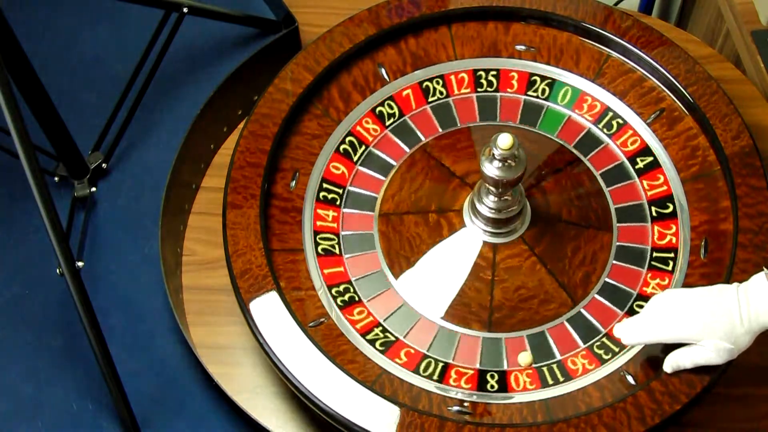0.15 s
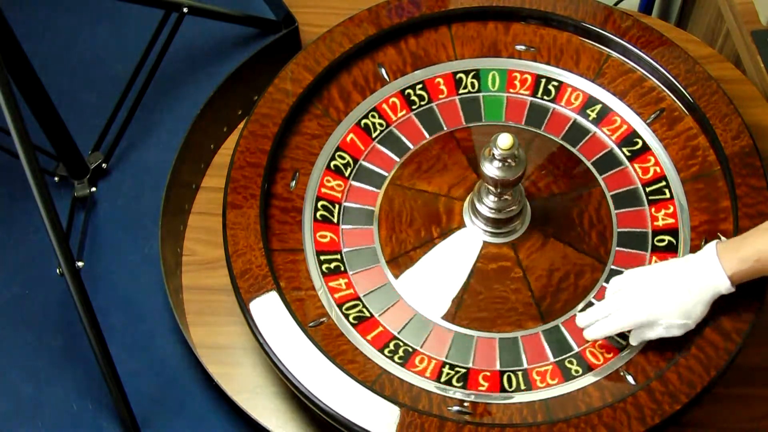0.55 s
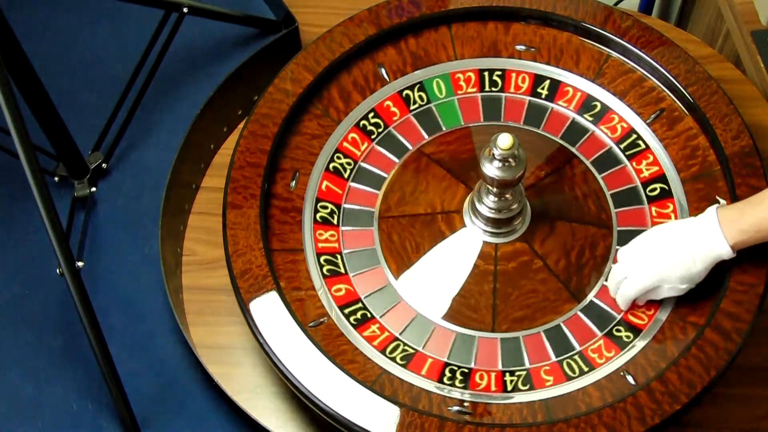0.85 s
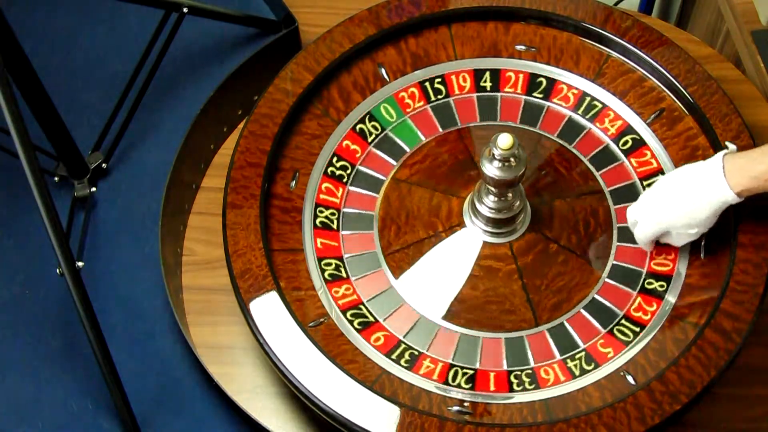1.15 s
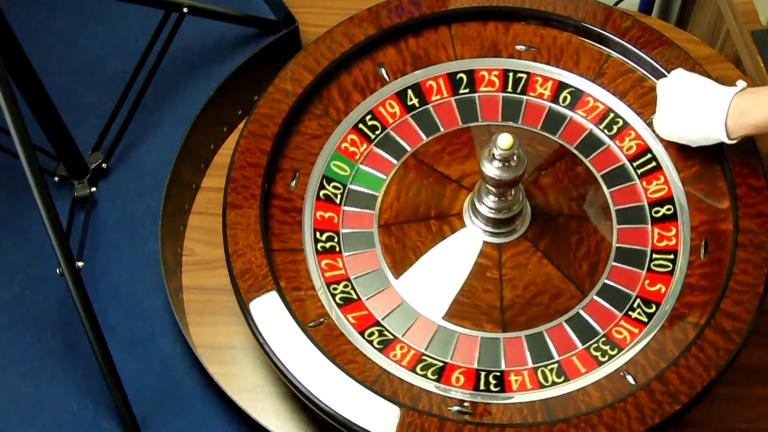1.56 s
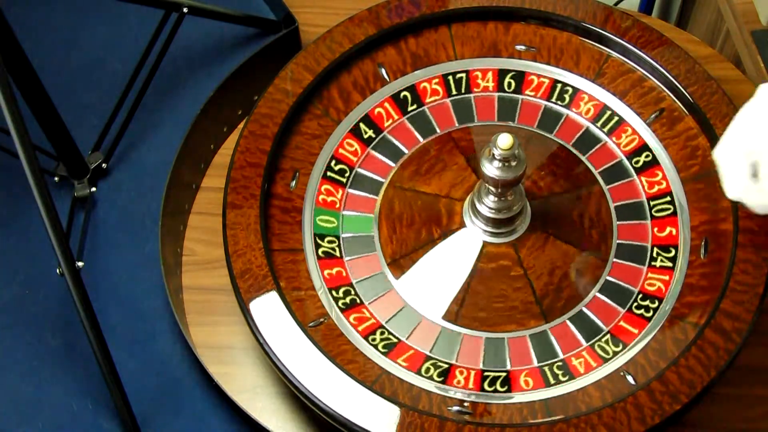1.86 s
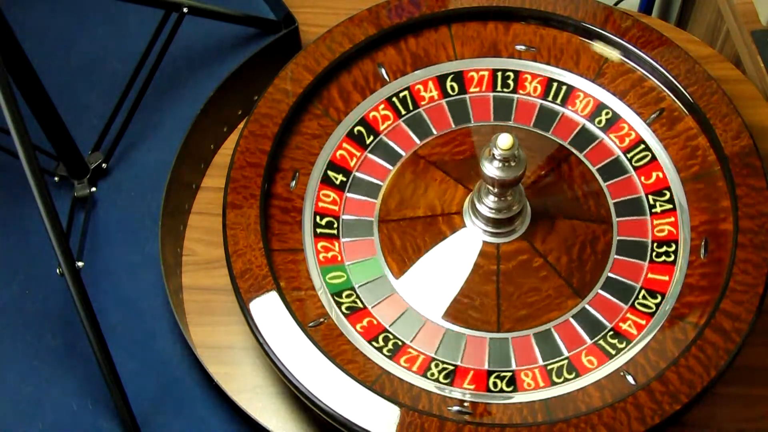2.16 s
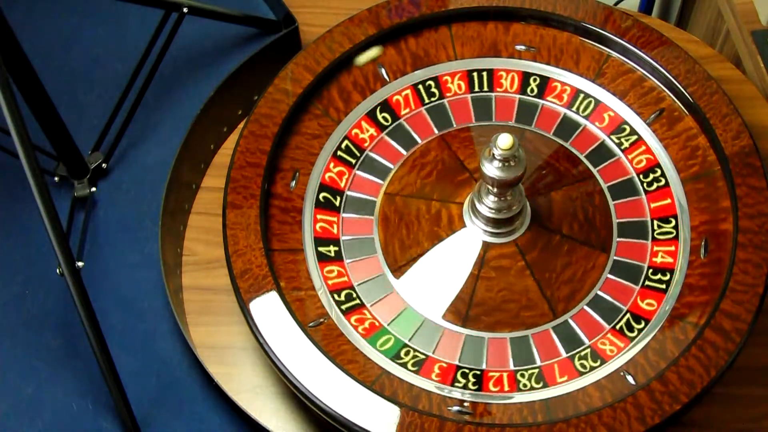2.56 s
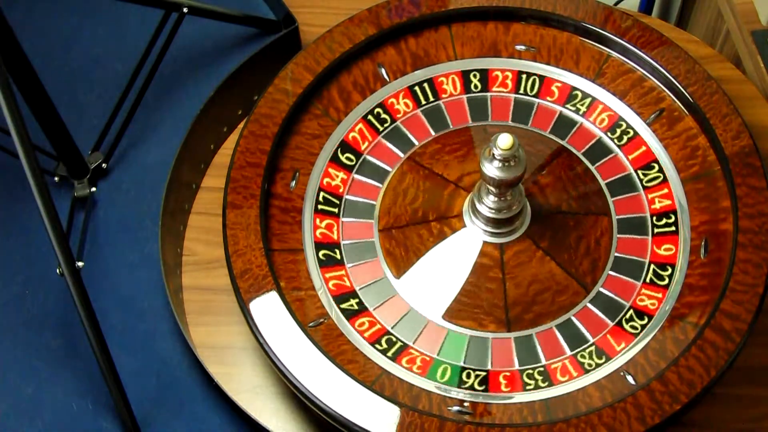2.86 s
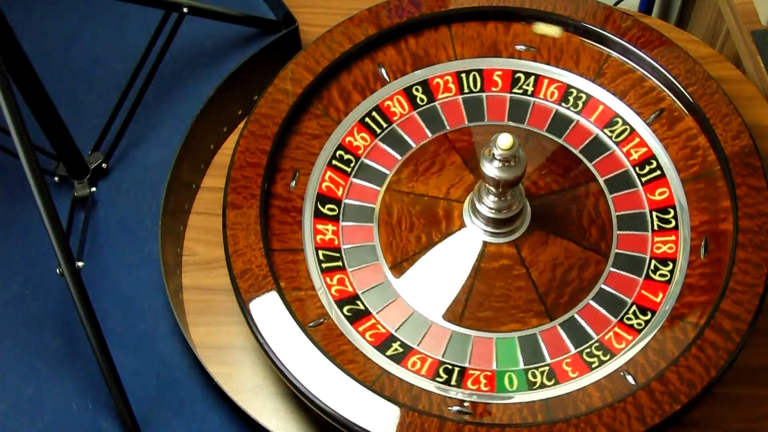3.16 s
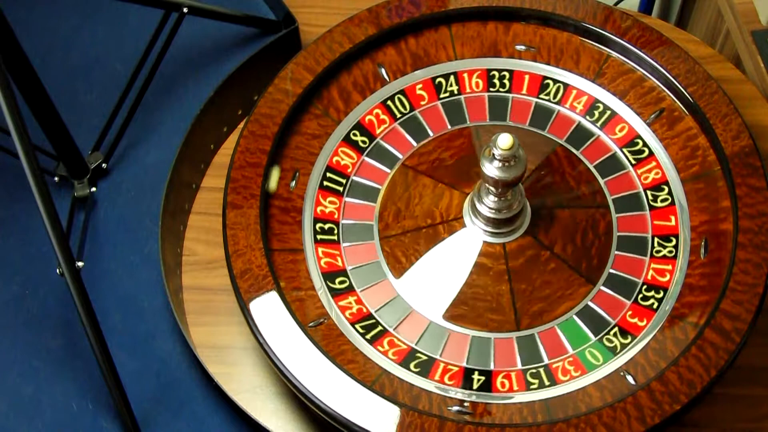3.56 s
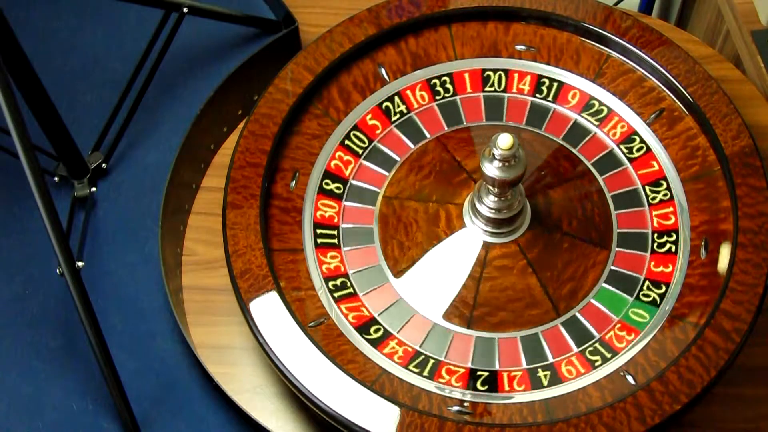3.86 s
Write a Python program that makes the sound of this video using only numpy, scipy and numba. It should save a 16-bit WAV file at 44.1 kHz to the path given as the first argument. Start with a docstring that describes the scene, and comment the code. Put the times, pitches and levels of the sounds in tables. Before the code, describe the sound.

A roulette ball rolls fast around a wooden bowl with a continuous grainy rumble, preceded by a few light metal clinks and a wooden clack; close stereo microphone in a small quiet room with faint hiss.

```python
"""Metal clinks, a wooden clack and a grainy rolling rumble over room rumble, hiss and a faint high whine.
A hand picks the ball from its pocket in a turning roulette wheel: the frets ring as decaying sine modes.
It presses the ball on the wooden track and flicks it away: band-limited knocks, one low hand thump and
a judder of bumps. The ball circles the bowl: random bumps drive rumble, grit, thrum and a gliding chatter.
"""
import sys
import numpy as np
from scipy import signal
from scipy.fft import rfft, irfft
from scipy.io import wavfile
from scipy.ndimage import uniform_filter1d
from numba import njit

SR = 44100
rng = np.random.default_rng(int(sys.argv[2]) if len(sys.argv) > 2 else 0)


def materialize(psi):
    """Save the field psi as 16-bit PCM at rate SR to the path in sys.argv[1].

    A 1-D psi becomes a single channel; in a 2-D psi each row is a channel.
    """
    bounded = np.clip(np.atleast_2d(psi).T, -1, 1)
    quanta = np.round(bounded * 32767).astype(np.int16)
    wavfile.write(sys.argv[1], SR, quanta)


N = 176400
TIME = np.arange(N) / SR
LAUNCH_S = 1.793

# ball touches the frets: t/s, ring level/dB, favoured f/Hz, scuff level/dB
FRET_TOUCHES = [(.058, -46, 650, -23), (.646, -55, 1300, -36), (.666, -36.5, 1730, -10),
                (.872, -46.5, 1510, -47), (0.907, -34.5, 1590, -11)]
# strength of rolling: t/s, chatter level/dB, treble level/dB
ROLL_LEVELS = [(1.8, -41, -30.5), (1.85, -28, -33), (1.87, -32, -32.5), (1.895, -35, -30),
               (1.925, -36.5, -24), (1.945, -25, -30), (1.965, -40, -29.5), (1.985, -45, -18),
               (2.045, -29.5, -22.5), (2.095, -31, -31.5), (2.125, -32.5, -26.5), (2.15, -32, -33.5),
               (2.175, -41, -22.5), (2.205, -39, -29.5), (2.22, -36, -24.5), (2.31, -34.5, -33.5),
               (2.35, -33.5, -34), (2.39, -38, -38), (2.42, -40, -33), (2.445, -34.5, -35),
               (2.5, -38.5, -32), (2.53, -31, -31), (2.56, -36.5, -28.5), (2.595, -43, -36.5),
               (2.63, -32.5, -32.5), (2.69, -31.5, -34), (2.735, -34, -32.5), (2.77, -43, -32.5),
               (2.825, -29, -29.5), (2.86, -30, -31), (2.885, -35.5, -30), (2.93, -39.5, -26),
               (3.0, -34.5, -26.5), (3.09, -42.5, -30.5), (3.135, -35.5, -33), (3.17, -38, -30),
               (3.22, -35.5, -28), (3.35, -33.5, -33), (3.38, -37.5, -35), (3.42, -42, -25.5),
               (3.45, -36.5, -42.5), (3.48, -39.5, -32.5), (3.52, -37, -35), (3.6, -39, -38),
               (3.67, -42, -33.5), (3.71, -35, -33), (3.755, -31.5, -33.5), (3.79, -39.5, -32.5),
               (3.825, -36, -30), (3.87, -42, -34), (3.9, -38, -35.5), (3.925, -43, -32.5),
               (3.945, -33.5, -29), (3.975, -40.5, -38.5), (4.0, -54, -29)]
# pitch of the ball's chatter on the track: t/s, f/Hz
CHATTER_PITCH = [(1.795, 2270), (1.83, 1190), (1.87, 840), (1.94, 626), (1.99, 574), (2.045, 640),
                 (2.09, 620), (2.125, 645), (2.17, 730), (2.22, 517), (2.26, 590), (2.3, 527), (2.335, 853),
                 (2.39, 935), (2.445, 936), (2.49, 720), (2.545, 605), (2.585, 490), (2.62, 670),
                 (2.72, 710), (2.745, 577), (2.765, 830), (2.8, 550), (2.845, 562), (2.865, 820),
                 (2.9, 516), (2.95, 407), (2.99, 706), (3.03, 510), (3.1, 524), (3.15, 746), (3.185, 630),
                 (3.215, 760), (3.245, 600), (3.28, 673), (3.345, 490), (3.395, 780), (3.42, 580),
                 (3.455, 767), (3.51, 514), (3.55, 800), (3.595, 850), (3.625, 640), (3.655, 840),
                 (3.695, 526), (3.75, 650), (3.79, 540), (3.825, 760), (3.86, 487), (3.9, 540), (3.94, 740),
                 (3.97, 500)]


def from_db(db):
    """Decibels to amplitude gain."""
    return 10 ** (np.asarray(db) / 20)


def rms_one(x):
    """Scale to unit power."""
    return x / np.sqrt(np.mean(x ** 2) + 1e-20)


def evened(x):
    """Hold the power steady over about 25 ms."""
    return x / np.sqrt(uniform_filter1d(x ** 2, size=1100) + 1e-12)


def in_time(rows):
    """Interpolate each column of a time table at every sample."""
    t, *columns = np.transpose(rows)
    return [np.interp(TIME, t, column) for column in columns]


def colour(x, points):
    """Minimum-phase equaliser through (f/Hz, level/dB) points."""
    size = 2 ** 18
    hz, db = np.transpose(points)
    grid_hz = np.maximum(np.fft.rfftfreq(size, 1 / SR), 1)
    gain = from_db(np.interp(np.log(grid_hz), np.log(hz), db))
    # folding the cepstrum makes the response causal
    cepstrum = irfft(np.log(gain))
    cepstrum[1:size // 2] *= 2
    cepstrum[size // 2 + 1:] = 0
    return irfft(rfft(x, size) * np.exp(rfft(cepstrum)))[:N]


def drift(rate_hz):
    """Low-passed noise with unit power."""
    r = np.exp(-2 * np.pi * rate_hz / SR)
    noise = rng.standard_normal(N + SR)
    settled = signal.lfilter([1], [1, -2 * r, r * r], noise)[SR:]
    return rms_one(settled)


def click(t_s, db):
    """One impulse at a given time and level."""
    out = np.full(N, 1e-18)
    out[int(t_s * SR)] += from_db(db)
    return out


def resonance(x, hz, width_hz):
    """Two-pole band-pass with about unit gain at its peak."""
    r = np.exp(-np.pi * width_hz / SR)
    zeros = np.array([1, 0, -1]) * (1 - r * r) / 2
    poles = [1, -2 * r * np.cos(2 * np.pi * hz / SR), r * r]
    return signal.lfilter(zeros, poles, x)


@njit
def moving_filter(x, hz, q):
    """State-variable filter along a pitch curve: band-pass and high-pass outputs."""
    out, low, band = np.zeros((2, len(x))), 0., 0.
    for i in range(len(x)):
        f = 2 * np.sin(np.pi * hz[i] / SR)
        low += f * band
        high = x[i] - low - band / q
        band += f * high
        out[0, i], out[1, i] = band, high
    return out


def stereo(mid, side):
    """Left and right from mid and side."""
    return np.array([mid + side, mid - side])


def background():
    """Room rumble and hiss as coloured noise; a thin electrical whine as a sine."""
    # noise colours: f/Hz, level/dB
    floor_mid = [(20, -3), (60, -4), (130, -6.5), (250, -8.5), (500, -13), (1000, -20.5), (2000, -26.5),
                 (3300, -33), (6000, -32.5), (15000, -34)]
    floor_side = [(20, -36), (60, -3), (130, -7.5), (250, -9), (500, -13), (1000, -16.5), (2000, -20.5),
                  (3300, -26.5), (6000, -25), (15000, -26.5)]
    floor_db, whine_hz, whine_db = -33, 15734, -73.5
    mid = colour(rng.standard_normal(N), floor_mid)
    side = colour(rng.standard_normal(N), floor_side)
    phase = np.array([[0], [np.pi / 2]])  # left, right
    whine = np.sqrt(2) * np.sin(2 * np.pi * whine_hz * TIME + phase)
    return from_db(floor_db) * stereo(mid, side) + from_db(whine_db) * whine


def reflections(early_t60_s, room_db):
    """Noise response: quick early echoes plus the room's tail, even in colour."""
    room_t60_s = 0.24
    t = TIME[:SR // 2]
    early = rms_one(from_db(-60 * t / early_t60_s)) ** 2
    room = from_db(room_db) ** 2 * rms_one(from_db(-60 * t / room_t60_s)) ** 2
    response = rng.standard_normal(len(t)) * np.sqrt(early + room)
    for _ in range(3):  # flatten the spectrum
        spectrum = rfft(response, SR)
        local_power = uniform_filter1d(abs(spectrum) ** 2, size=25)
        response = irfft(spectrum / np.sqrt(local_power))[:len(t)]
    return response


def radiate(x, early_t60_s, room_db):
    """Echoes spread a source in stereo: narrow in the bass, wide in the treble."""
    # stereo width: f/Hz, side-minus-mid level/dB
    side_levels = [(100, -14), (400, -12), (700, -4.5), (1000, 0.5), (1300, 4), (2200, 4.5), (3500, 7.5),
                   (8000, 5)]
    alike = 0.15  # power share of the side that is the middle a quarter cycle apart
    middle = rfft(reflections(early_t60_s, room_db))
    other = rfft(reflections(early_t60_s, room_db))
    hz, db = np.transpose(side_levels)
    grid_hz = np.linspace(1, SR / 2, len(middle))
    width = from_db(np.interp(np.log(grid_hz), np.log(hz), db))
    side = width * (-1j * np.sqrt(alike) * middle + np.sqrt(1 - alike) * other)
    responses = irfft(stereo(middle, side) / np.sqrt(1 + width ** 2))[:, :SR // 3]
    return signal.fftconvolve(x[None], responses, axes=1)[:, :N]


def bowl(force):
    """The wooden bowl passes the force on and adds its resonances."""
    # bowl resonances: f/Hz, width/Hz, gain/dB
    bowl_modes = [(125.5, 5.4, 6), (204.4, 2.9, 7), (236.3, 4.4, 1.5), (492, 16.7, 13.5), (539, 5.3, 1),
                  (640.9, 6.9, 8.5), (685.2, 6.8, 10.5), (796.6, 18.4, 10.5), (867, 78, -3),
                  (937.3, 11.7, 7.5), (1115.3, 27.4, 9.5), (1449, 22.7, 6.5), (1567, 23, -0.5),
                  (1770, 52, -3), (2112, 55, 6), (2406, 57, 4.5)]
    ringing = sum(from_db(db) * resonance(force, hz, width_hz) for hz, width_hz, db in bowl_modes)
    return force + ringing


def frets():
    """Each touch rings decaying metal modes, most strongly near its favoured pitch."""
    # fret modes: f/Hz, level/dB, t60/s
    fret_modes = [(541, -5, 0.22), (858, -4, 0.15), (874, -0.5, 0.28), (1598, 0, .06), (1603, -3, 0.35),
                  (2060, -12, .1), (2534, -5.5, 0.2), (3200, -3, 0.08), (3630, -3, 0.23)]
    focus_db = 5  # loss per squared octave from the favoured pitch
    rise_s = 0.0044  # the ball leans on the fret, so the ring builds up
    out = np.zeros(N)
    for t_s, db, favoured_hz, _ in FRET_TOUCHES:
        age = TIME[TIME >= t_s] - t_s
        build_up = 1 - np.exp(-age / rise_s)
        for hz, mode_db, t60_s in fret_modes:
            level_db = db + mode_db - focus_db * np.log2(hz / favoured_hz) ** 2
            decay = from_db(level_db - 60 * age / t60_s)
            out[N - len(age):] += decay * build_up * np.sin(2 * np.pi * hz * age)
    return out


def ticks():
    """Each fret touch sends a short scuff, an enveloped noise burst, through the wood."""
    # tick colour: f/Hz, level/dB
    tick_colour = [(300, -10), (550, 2), (1200, 0), (2200, 1), (3300, 5), (4400, -4.5), (5500, -18),
                   (12000, -31)]
    scuff_s = 0.005
    out = 0
    for t_s, _, _, db in FRET_TOUCHES:
        age = np.maximum(TIME - t_s, 0) / scuff_s
        scuff = rng.standard_normal(N) * np.sqrt(age) * np.exp(-age)
        out = out + from_db(db) * scuff / np.linalg.norm(scuff)
    return colour(out, tick_colour)


def bumps():
    """Sparse random impulses: tiny impacts of the ball on the grain of the track."""
    bumps_per_s, spread_db = 1400, 3.5
    sizes = from_db(spread_db * np.minimum(rng.exponential(1, N), 5))
    signs = rng.choice([-1, 1], N)
    return sizes * signs * (rng.random(N) < bumps_per_s / SR)


def judder():
    """A short run of small bumps, ball pressed to track: fades, swells again softly and dies."""
    # judder strength: t/s, level/dB
    judder_levels = [(1.497, -88), (1.503, -29.5), (1.53, -34), (1.548, -51), (1.59, -41), (1.615, -41),
                     (1.632, -56), (1.7, -85)]
    # judder colour: f/Hz, level/dB
    judder_tone = [(150, -7), (350, -5), (500, 0), (670, -10.5), (850, 3), (1300, 0), (2100, -2),
                   (3000, -1.5), (4000, -8), (5200, -34), (12000, -29)]
    db, = in_time(judder_levels)
    return from_db(db) * rms_one(colour(bumps(), judder_tone))


def knocks():
    """Ball knocks on wood and one low hand thump: a click and a noise rattle, each in its own band."""
    # knocks and hand thump (1.811 s): t/s, level/dB, low edge f/Hz, high edge f/Hz
    wheel_blows = [(1.4965, 17, 1480, 4500), (1.5012, 14.5, 1230, 3850), (1.502, 10, 414, 930),
                   (1.506, 16.5, 194, 244), (1.510, 2.5, 1200, 4220), (1.523, 8.5, 396, 990),
                   (1.794, 12, 2120, 2470), (1.804, 13.5, 2200, 2510), (1.811, 15, 91, 220),
                   (1.977, 8, 199, 5300), (2.03, 17.5, 193, 257), (2.109, 7, 189, 250),
                   (3.938, 13, 733, 830)]
    # colour of all blows: f/Hz, level/dB
    blow_colour = [(100, -7.5), (1000, 3.5), (2200, 1), (4300, -3), (5200, -20), (7500, -22), (11000, -9),
                   (15000, -5)]
    rattle_s, rattle_db = 0.0018, -4  # rattle level relative to the click
    out = 0
    for t_s, db, low_hz, high_hz in wheel_blows:
        rattle = rng.standard_normal(N) * (TIME > t_s) * np.exp(-abs(TIME - t_s) / rattle_s)
        force = click(t_s, db) + from_db(db + rattle_db) * rattle / np.linalg.norm(rattle)
        band = signal.butter(2, [low_hz, high_hz], "band", fs=SR, output="sos")
        out = out + signal.sosfilt(band, force)
    return colour(out, blow_colour)


def contact():
    """The ball's grip on the track: sets in at the launch and flutters slightly."""
    rise_s, roll_db = 0.0099, -0.83
    flutter_db, flutter_hz = 1.04, 32
    onset = np.clip((TIME - LAUNCH_S) / rise_s, 0, 1)
    return onset * from_db(roll_db + flutter_db * drift(flutter_hz))


def rolling():
    """Bumps drive a rumble with a pitch-following low edge, a gritty treble and a low thrum."""
    # rolling colours: f/Hz, level/dB
    rumble_colour = [(200, -25), (500, -3), (800, 1), (1200, 0), (1800, 5), (2400, -4.5), (3300, -32),
                     (4300, -50), (5500, -31)]
    treble_colour = [(500, -26), (1200, 2), (2200, 3), (3300, 5.5), (4200, -3.5), (4800, -16.5),
                     (5600, -24), (7500, -48), (10500, -34), (15000, -60)]
    thrum_colour = [(50, -20), (120, -4.5), (215, 1.5), (350, 9), (600, -12), (1500, -40)]
    rumble_gain_db, treble_gain_db, thrum_gain_db = -3.5, -5.5, -23.5
    edge_share = 0.58  # rumble's low edge / chatter pitch
    rumble_follows = 0.21  # chatter's share of the rumble level; treble has the rest
    thrum_follows = 1.1  # thrum swing / treble swing, in dB
    chatter_db, treble_db = in_time(ROLL_LEVELS)
    pitch_hz, = in_time(CHATTER_PITCH)

    rumble = colour(bumps(), rumble_colour)
    for _ in range(2):
        rumble = evened(moving_filter(rumble, pitch_hz * edge_share, 0.98)[1])
    rumble_db = rumble_gain_db + treble_db + rumble_follows * (chatter_db - treble_db)

    grit = rms_one(colour(bumps(), treble_colour))
    grit_db = treble_gain_db + treble_db

    thrum = rms_one(colour(bumps(), thrum_colour))
    mean_db = treble_db.mean()
    thrum_db = thrum_gain_db + mean_db + thrum_follows * (treble_db - mean_db)
    return from_db(rumble_db) * rumble + from_db(grit_db) * grit + from_db(thrum_db) * thrum


def chatter():
    """Bumps drive the gliding resonance of the ball on the track."""
    gain_db, narrow_q, broad_q = -5, 8.9, 0.92  # the broad pass keeps chatter out of the treble
    db, _ = in_time(ROLL_LEVELS)
    pitch_hz, = in_time(CHATTER_PITCH)
    narrow = moving_filter(bumps(), pitch_hz, narrow_q)[0]
    skirted = moving_filter(narrow, pitch_hz, broad_q)[0]
    return from_db(gain_db + db) * evened(skirted)


def scene():
    """Ball and bowl shift between two echo patterns; the wheel stands a little to the right."""
    chatter_wood_db, chatter_air_db, pan_db = -7, 0, -0.7
    laps_per_s, lobes_per_lap = 2.0, 2.2  # the ball meets the bowl's vibration patterns in turn
    grip = contact()
    ball = grip * chatter()
    force = grip * rolling() + from_db(chatter_wood_db) * ball + knocks() + judder() + ticks()
    wood = bowl(force) + from_db(chatter_air_db) * ball
    angle = 2 * np.pi * laps_per_s * lobes_per_lap * np.maximum(TIME - LAUNCH_S, 0)
    wheel = radiate(wood * np.cos(angle), early_t60_s=0.07, room_db=-10)
    wheel = wheel + radiate(wood * np.sin(angle), early_t60_s=0.07, room_db=-10)
    # the frets lie open to the air and sound nearly dry
    wheel = wheel + radiate(frets(), early_t60_s=0.01, room_db=-16.5)
    return wheel * from_db(pan_db * np.array([[1], [-1]])) + background()


def record(dry):
    """Two narrow cuts, then a steep low-pass."""
    # cuts: f/Hz, width/Hz
    notches = [(2870, 750), (5000, 150)]
    cutoff_hz = 15900
    for hz, width_hz in notches:
        dry = signal.lfilter(*signal.iirnotch(hz, hz / width_hz, fs=SR), dry)
    low_pass = signal.ellip(12, .1, 80, cutoff_hz, fs=SR, output="sos")
    return signal.sosfilt(low_pass, dry)


dry = scene()
out = record(dry)
materialize(out)
```